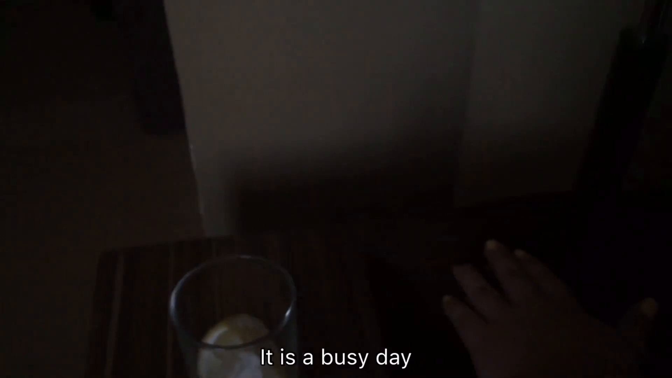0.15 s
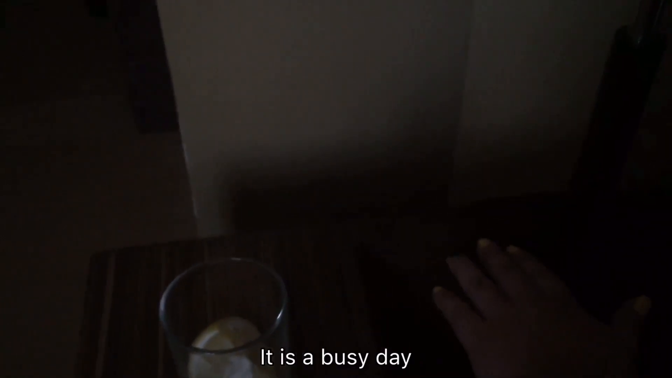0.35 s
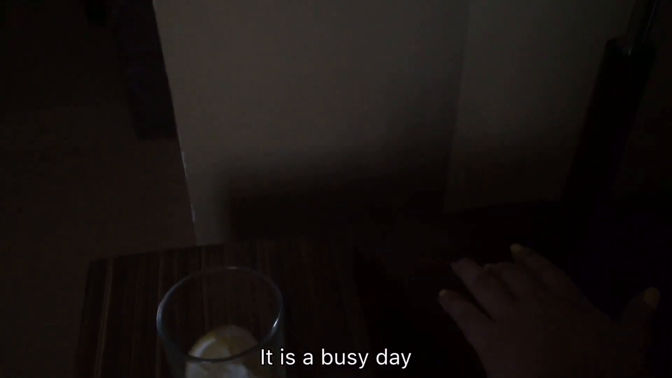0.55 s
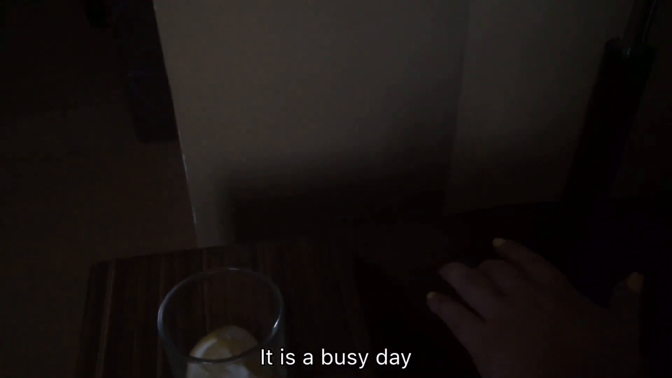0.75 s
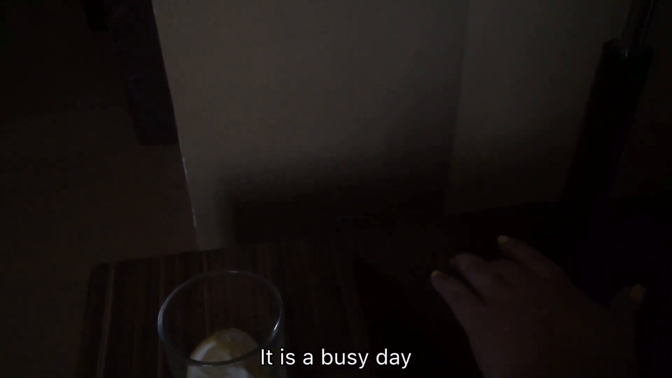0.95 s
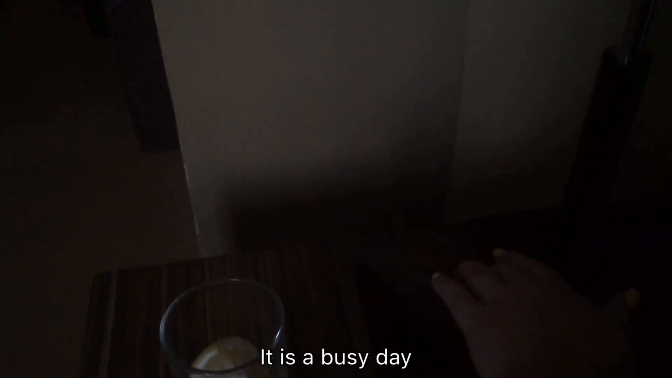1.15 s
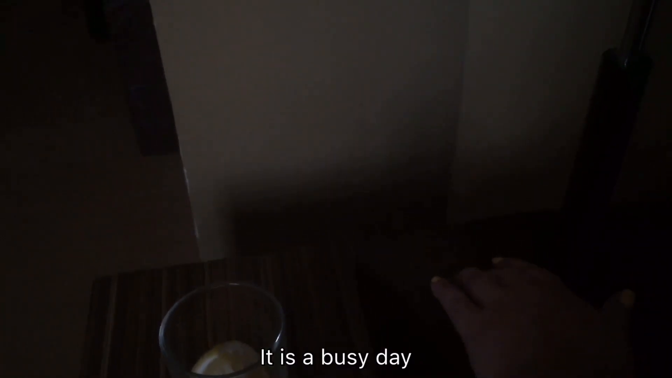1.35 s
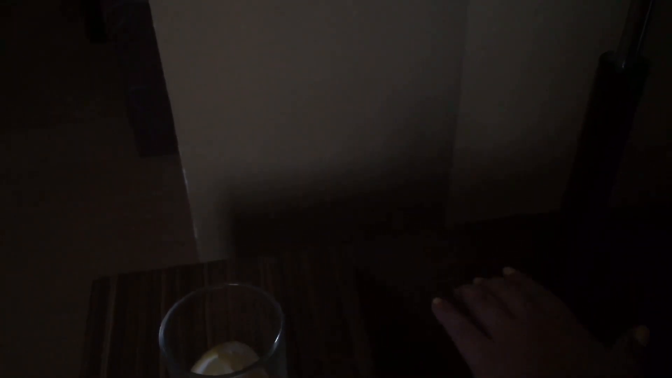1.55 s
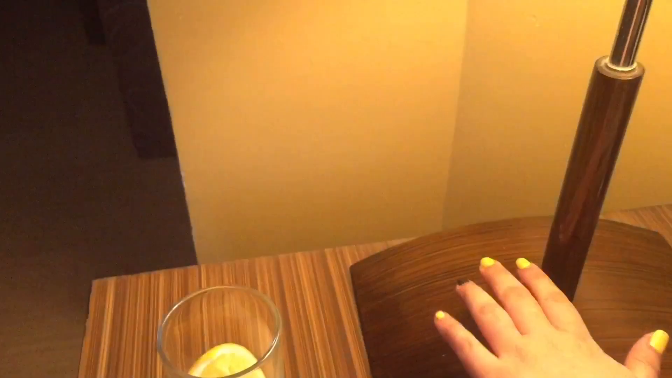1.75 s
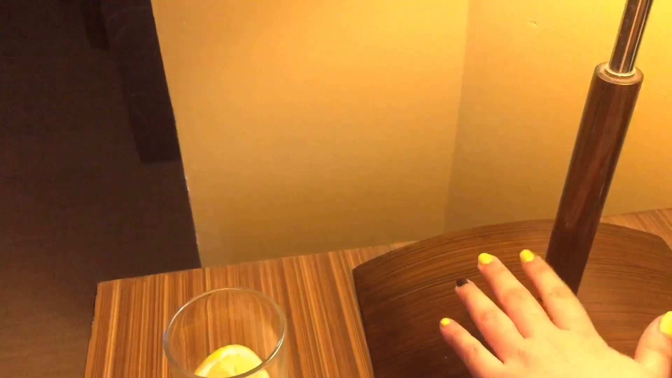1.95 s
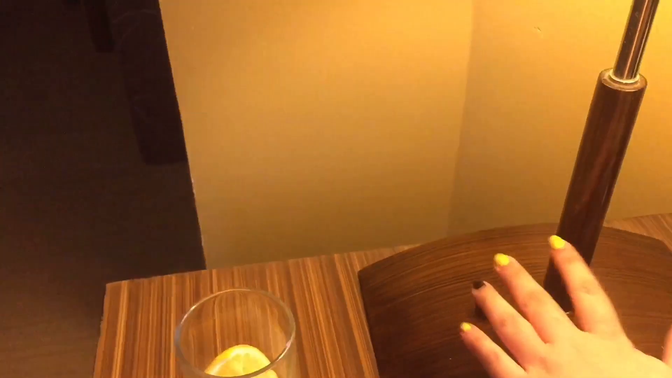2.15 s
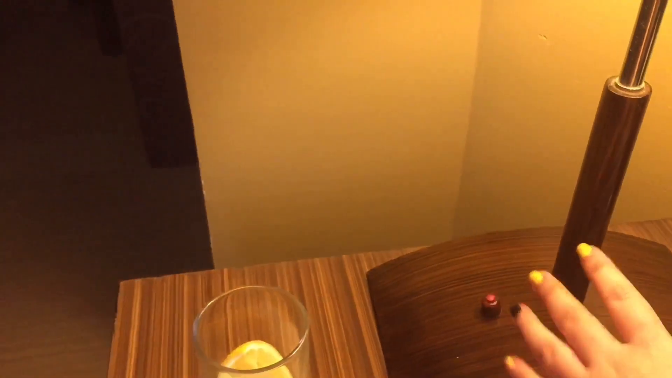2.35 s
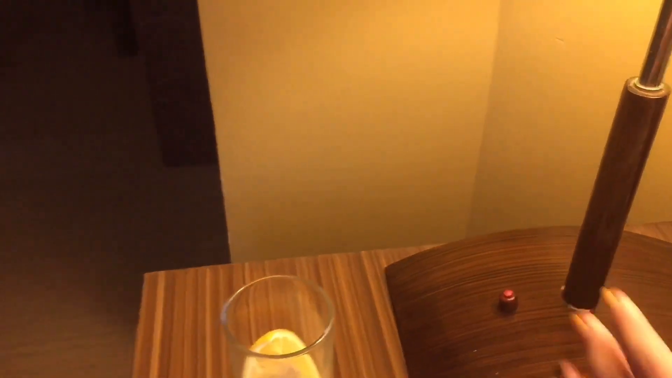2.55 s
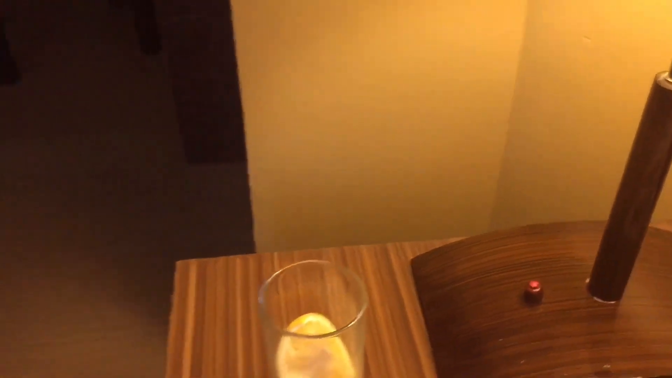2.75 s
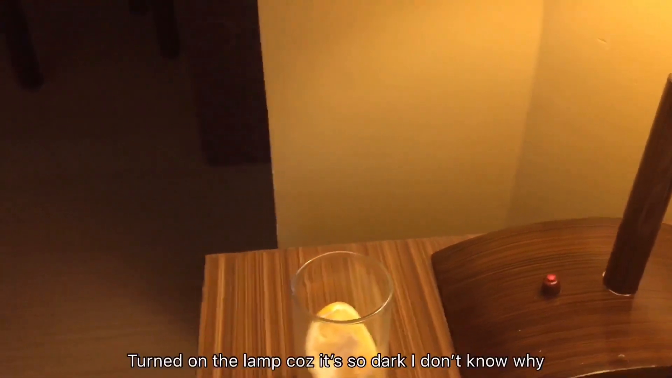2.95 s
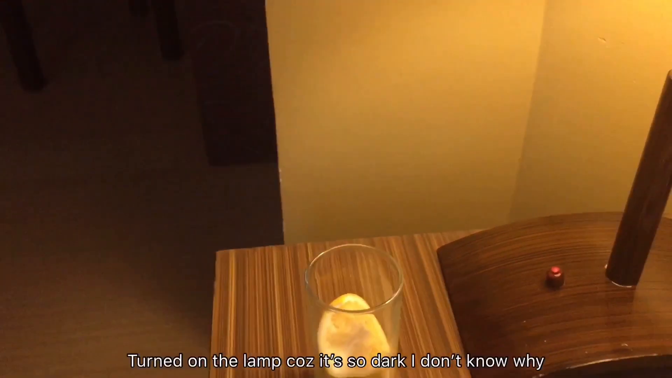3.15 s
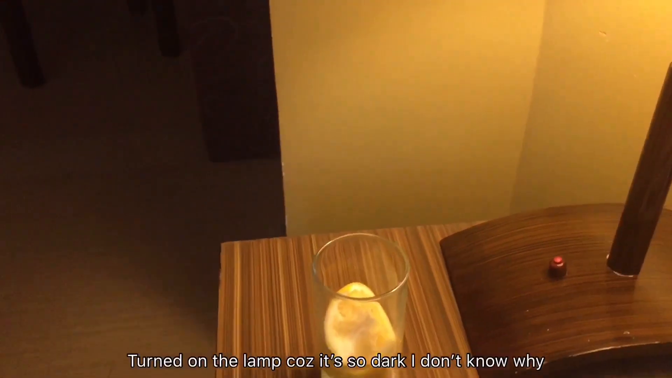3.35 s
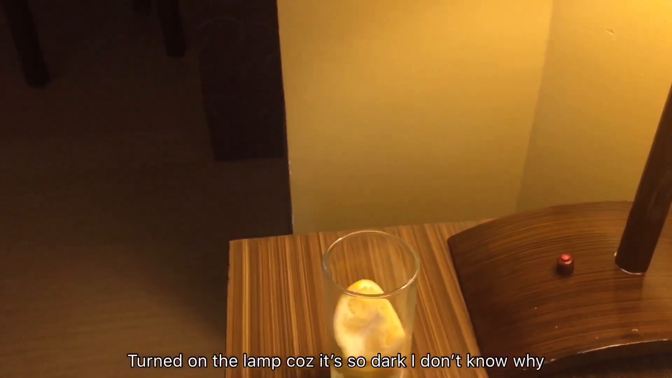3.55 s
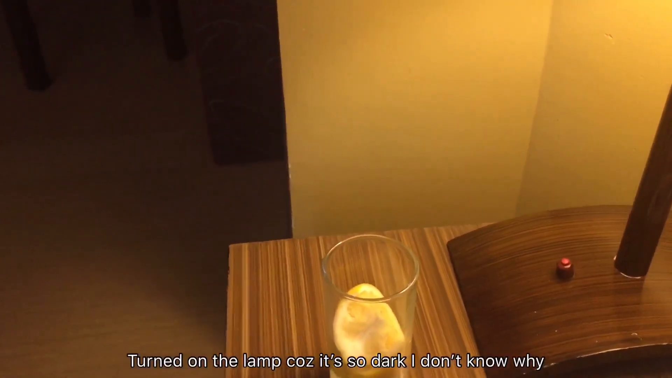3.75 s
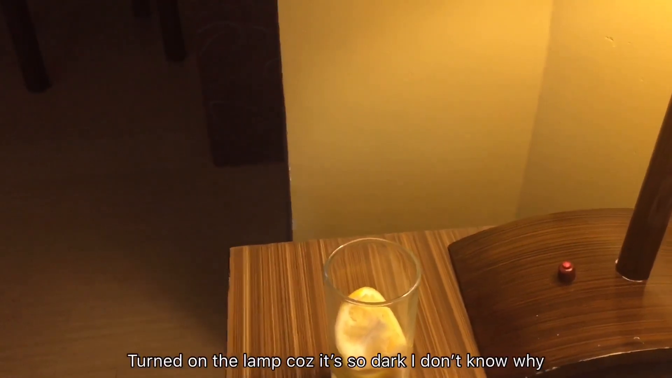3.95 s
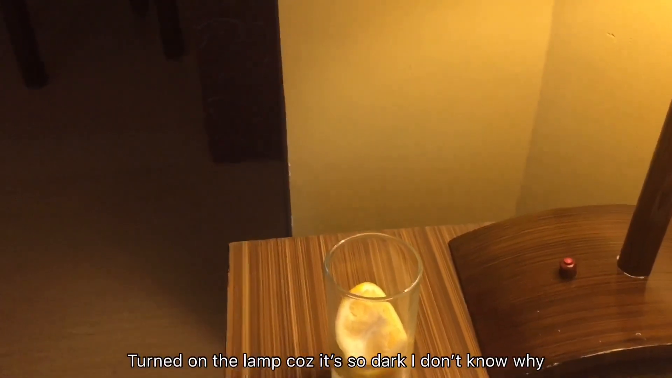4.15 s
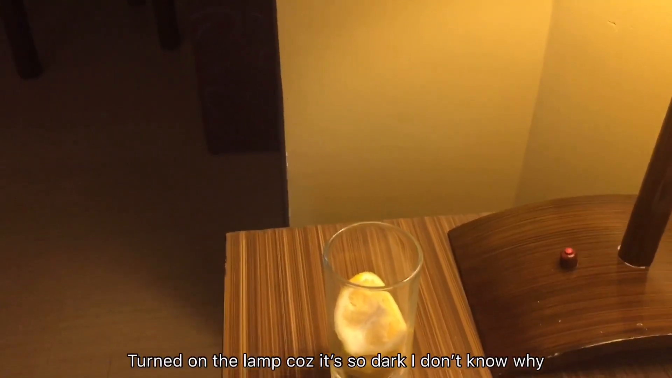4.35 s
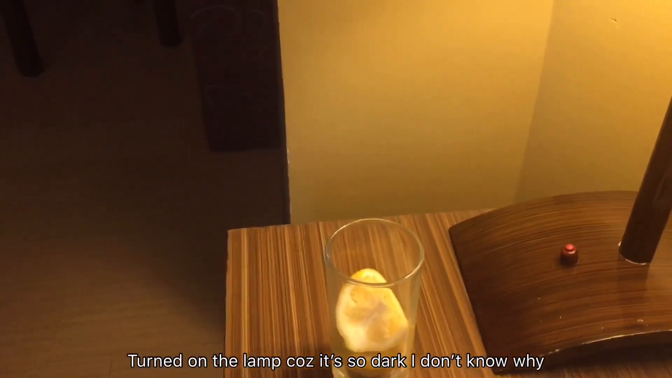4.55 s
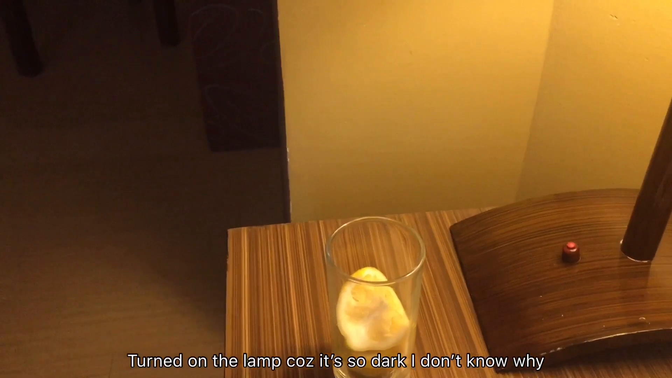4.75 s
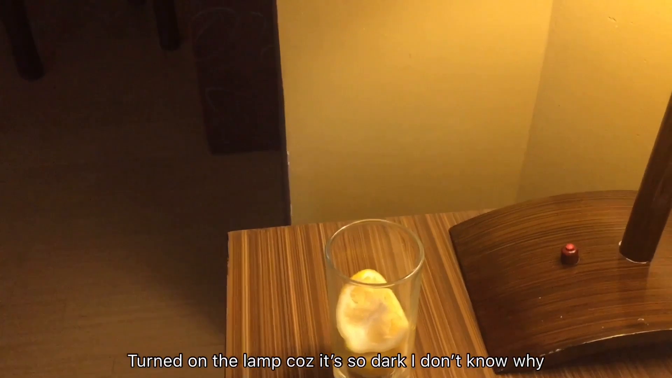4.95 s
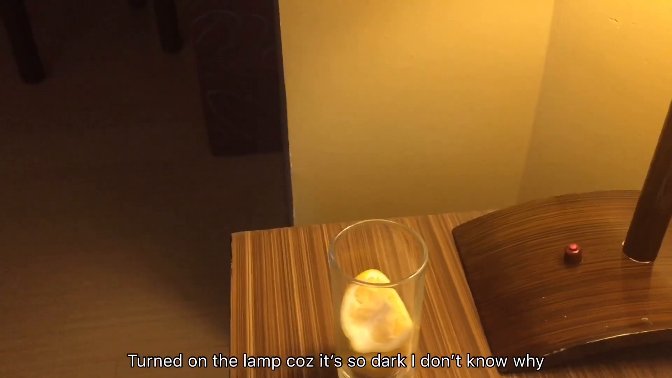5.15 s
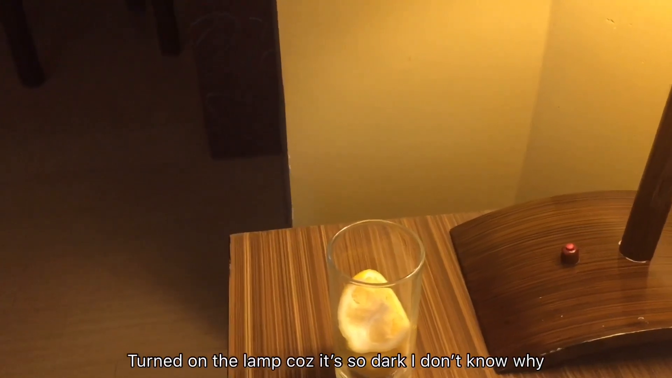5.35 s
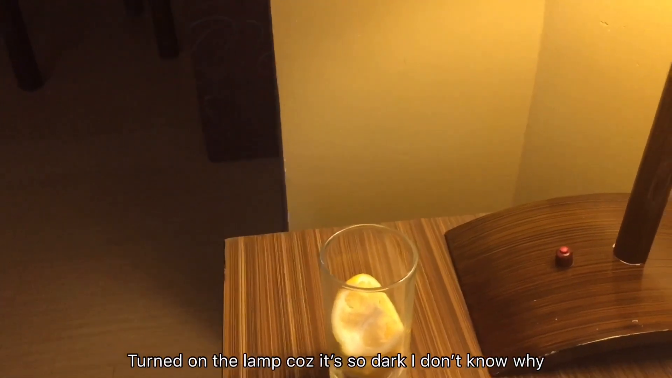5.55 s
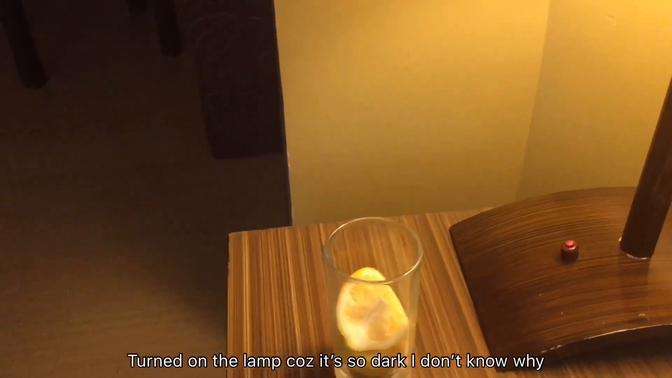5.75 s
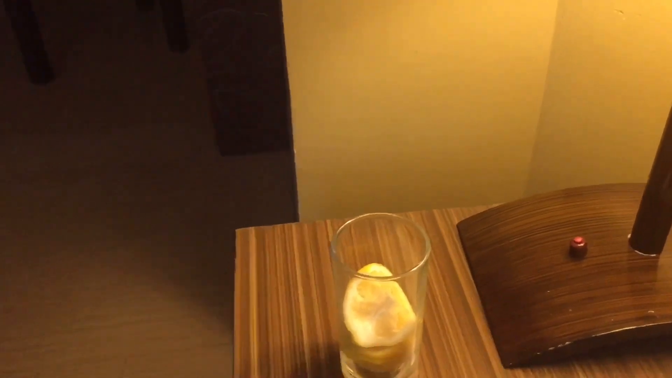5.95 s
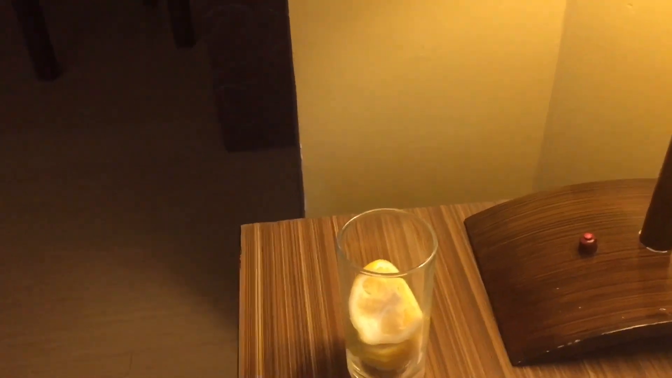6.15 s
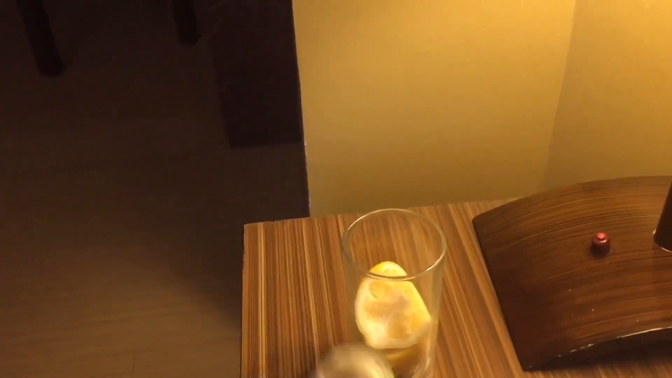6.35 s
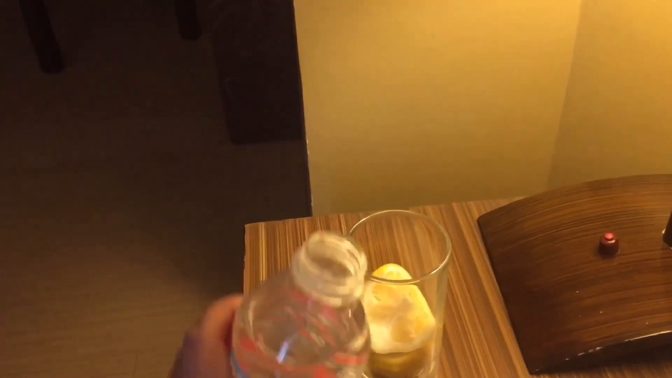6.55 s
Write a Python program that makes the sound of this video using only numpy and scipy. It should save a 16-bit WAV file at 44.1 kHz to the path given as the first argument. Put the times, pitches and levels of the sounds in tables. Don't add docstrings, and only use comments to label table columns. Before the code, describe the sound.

Throughout, a low ventilation rumble fills a quiet furnished room, wavering gently, with soft upper air hiss and a barely audible mid-pitched duct whistle; it swells slightly at the end. At about 1.08 s a lamp push switch gives a sharp, close double-edged click; at 1.66 s it releases with a louder, brighter clack, ringing briefly through base and stem. Soft low booms follow at 1.7 and 2.7 s. A faint ping touches at 2.4 s, and very quiet rubbing passes near 2.9 s. At 3.27 s plastic crackles and scrapes, then tiny squeaks at 3.4 to 3.7 s. Around 3.96 s rubs and ticks lead into a crisp seal snap at 3.99 s, a weaker one at 4.13 s and a hard knock with a small glassy ring at 4.2 s. Light rubs and taps come at 4.5 to 4.6 s, ticks at 5.1 s, and final ticks, a scrape and a small low squeak at 6.0 to 6.15 s.

```python
import sys
import numpy as np
from scipy import signal
from scipy.fft import rfft, irfft
from scipy.io import wavfile
from scipy.ndimage import uniform_filter1d

SR = 44100
rng = np.random.default_rng(int(sys.argv[2]) if len(sys.argv) > 2 else 0)


def level_to_linear(level):
    exponent = np.asarray(level, float) / 20
    return 10 ** exponent


def generate_wav(signal):
    frames = np.transpose(np.atleast_2d(signal))
    scaled = np.clip(frames, -1, 1) * 32767
    pcm = np.round(scaled).astype(np.int16)
    wavfile.write(sys.argv[1], SR, pcm)


N = 294588
T = np.arange(N) / SR


def coloured(x, hz, db):
    f = np.maximum(np.fft.rfftfreq(len(x), 1 / SR), 1)
    gain = level_to_linear(np.interp(np.log(f), np.log(hz), db))
    return irfft(rfft(x) * gain, len(x))


def resonance(x, hz, width_hz):
    b, a = signal.iirpeak(min(hz, .45 * SR), hz / width_hz, fs=SR)
    return signal.lfilter(b, a, x)


def unit(x):
    return x / np.sqrt(np.mean(x ** 2))


def bell(s, half, order=2):
    return np.exp(-np.abs((T - s) / half) ** order / 2)


def even(band):
    power = uniform_filter1d(uniform_filter1d(band ** 2, size=5000), size=5000)
    return band / np.sqrt(power)


def ventilation():
    # frequency in Hz, level in dB per Hz
    air_spectrum = [(15, -26.5), (42, -23), (52, -2), (75, 2), (108, -9.5), (179, -5.5), (237, -18),
                    (305, -18), (440, -29), (749, -36), (2000, -38.5), (4000, -45), (8000, -51),
                    (16500, -54)]
    # frequency in Hz, width in Hz, gain in dB
    room_modes = [(62.5, 6.3, 3), (77.6, 4.1, 4.5), (135, 10, -4.5), (177.8, 8.87, 7.5), (212, 9.2, 5.5),
                  (300, 30, 2), (980, 62, 3.5), (5000, 500, -3.5), (10530, 510, -6)]
    # time in seconds, level in dB
    flow = [(0, -49.5), (.43, -47.5), (.76, -53), (1.06, -49), (1.55, -49.5), (2.1, -48), (2.9, -50),
            (3.3, -49), (4.04, -50), (4.5, -50.5), (4.9, -48.5), (5.3, -49), (5.9, -48.5), (6.5, -49),
            (6.68, -44.5)]
    # time in seconds, half length in seconds, gain in dB
    lull = (5.02, 0.024, -20)
    # time in seconds, level in dB
    duct = [(0, -69), (1.2, -70), (2.3, -70), (3.2, -75.5), (4.5, -74), (5.5, -75), (6.68, -74)]
    air_db, ripple_db = -46.5, 2.5
    gust_db, gusts_per_s = 1.5, 7
    duct_hz, duct_width_hz = 575.4, 25.8

    hz = np.geomspace(15, 20000, num=2000)
    air_hz, air_level_db = np.transpose(air_spectrum)
    db = np.interp(np.log(hz), np.log(air_hz), air_level_db)
    for mode_hz, width_hz, gain_db in room_modes:
        db = db + gain_db / (1 + (2 * (hz - mode_hz) / width_hz) ** 2)
    ripple = uniform_filter1d(rng.standard_normal(len(hz)), size=5) * np.sqrt(5)
    db = db + ripple_db * ripple * np.clip(np.log2(hz / 230), 0, 1) * np.clip(5000 / hz, 0, 1)
    air = level_to_linear(air_db) * unit(coloured(rng.standard_normal(N), hz, db))

    deep = coloured(air, [110, 120], [0, -200])
    upper = coloured(air - deep, [230, 245], [0, -200])
    out = air - deep - upper
    flow_db = np.interp(T, *np.transpose(flow))
    mean_db = np.mean(flow_db)
    lull_s, lull_half_s, lull_db = lull
    stall_db = lull_db * bell(lull_s, lull_half_s)
    # how far each band follows the flow, dB per dB
    for band, band_db, swing in ((deep, -2.5, 1.2), (upper, -2.5, .8)):
        gusts = np.interp(T * gusts_per_s, np.arange(200), rng.standard_normal(200))
        swell_db = swing * (flow_db - mean_db) + gust_db * gusts + stall_db
        out = out + even(band) * level_to_linear(mean_db + band_db + swell_db)

    whistle = resonance(rng.standard_normal(N), duct_hz, duct_width_hz)
    whistle = resonance(whistle, duct_hz, 2 * duct_width_hz)
    return out + unit(whistle) * level_to_linear(np.interp(T, *np.transpose(duct)))


def add(track, s, sound):
    i = int(s * SR)
    track[..., i:i + sound.shape[-1]] += sound[..., :N - i]


def chatter(ms, size=4096):
    noise, spikes = rng.standard_normal((2, size))
    fade = np.exp(-T[:size] * 1000 / ms)
    force = noise * level_to_linear(3 * spikes) * fade
    return force * np.sqrt(np.sum(fade ** 2) / np.sum(force ** 2))


def ring(hz, t60, db, spread, size=16384):
    t = T[:size]
    shift = np.array([[-1], [-.4], [.55], [1.2]]) + rng.uniform(-.12, .12, (4, 1))
    neighbours = np.sum(np.sin(2 * np.pi * hz * (1 + spread * shift) * t), axis=0)
    cluster = .5 * np.sin(2 * np.pi * hz * t) + .33 * neighbours
    decay = np.exp(-np.log(1000) * t / t60)
    return level_to_linear(db) * cluster * decay * np.minimum(t / 0.00081, 1)


def strike(impacts, body, crack_hz, crack_db, knock_hz, knock_db):
    blur = 2.5
    out = np.zeros((2, N))
    for s, db, ms in impacts:
        force = .5 * chatter(ms)
        click = np.sqrt(np.sum(force ** 2)) * (T[:len(force)] == 0)
        push = np.array([force, click])
        crack = resonance(resonance(push, crack_hz, 1.4 * crack_hz), crack_hz, 2 * crack_hz)
        crack = level_to_linear(crack_db) * crack
        knock = resonance(resonance(push, knock_hz, 1.2 * knock_hz), knock_hz, 2 * knock_hz)
        knock = level_to_linear(knock_db) * knock
        near = crack[0] + knock[0]
        parts = [crack[1], knock[1]]
        for k, (hz, width_hz, gain_db) in enumerate(body):
            near = near + (-1) ** k * level_to_linear(gain_db) * resonance(force, hz, width_hz)
            parts.append(level_to_linear(gain_db) * resonance(click, hz, width_hz * blur) / np.sqrt(blur))
        power = np.sum(np.abs(rfft(np.array(parts))) ** 2, axis=0)
        far = np.roll(irfft(np.sqrt(power)), 96)
        far = far * (T[:len(far)] < .02)
        add(out, s, level_to_linear(db) * np.array([near, far]))
    return out


def switch():
    # time in seconds, level in dB, chatter in ms
    press = [
        (1.0765, -13.5, 0.67),
        (1.078, -11, 0.64),
        (1.0806, -10, 1.8),
    ]
    # time in seconds, level in dB, chatter in ms
    release = [
        (1.662, -46.5, 1),
        (1.6631, -13, 2),
        (1.6653, -6, 0.58),
        (1.6663, -1, 1.87),
    ]
    # frequency in Hz, width in Hz, level in dB
    press_body = [(1074, 44, 12.5), (1530, 43, 14), (2650, 440, 7.5), (4440, 290, 7.5), (5360, 280, -2),
                  (7000, 570, 5.5), (7760, 340, 2), (9670, 370, 2), (11400, 620, -4), (13200, 260, 0),
                  (14800, 390, -9)]
    # frequency in Hz, width in Hz, level in dB
    release_body = [(1530, 220, -8.5), (2058, 210, 1.5), (3000, 220, 3.5), (4250, 710, 3.5),
                    (5600, 220, 6.5), (6480, 260, 8), (7050, 250, 1), (8320, 600, 4.5), (10400, 300, -5.5),
                    (13020, 400, 2.5), (14300, 400, -6), (15400, 400, -11)]
    # frequency in Hz, t60 in seconds, press level in dB, release level in dB
    lamp_rings = [(140, 0.47, -46, -35.5), (1054, 0.25, -50, -58), (1519, 0.19, -46, -34),
                  (1540, 0.063, -39, -28.5), (2067, 0.23, -51, -29), (2636, 0.26, -45, -58.5),
                  (3010, 0.1, -54, -45), (4360, .3, -43, -58.5), (5620, 0.3, -58, -37),
                  (6886, .14, -40, -45), (13230, .07, -50, -50)]
    out = strike(press, press_body, crack_hz=6000, crack_db=-8, knock_hz=1050, knock_db=-17)
    out += strike(release, release_body, crack_hz=7500, crack_db=-7.0, knock_hz=810, knock_db=-15.5)
    for hz, t60, press_db, release_db in lamp_rings:
        add(out, press[1][0], ring(hz, t60, press_db, spread=.05))
        add(out, release[2][0], ring(hz, t60, release_db, spread=.016))
    return out


def room(x, size=22050):
    # frequency in Hz, t60 in seconds, level in dB
    absorption = [(202.2, .35, -2), (1500, 0.2, 3.5), (4000, 0.3, 0.5), (8000, 0.14, -2), (16100, 0.26, 2)]
    onset_s = 0.001
    t, tail = T[:size], 0
    hz, t60, db = np.transpose(absorption)
    for f in 150 * 2 ** np.arange(0, 7, .5):
        band_db = np.interp(np.log(f), np.log(hz), db)
        band_t60 = np.interp(np.log(f), np.log(hz), t60)
        band = resonance(rng.standard_normal(size), f, f / 2.2) * level_to_linear(band_db)
        tail = tail + band * np.exp(-np.log(1000) * t / band_t60)
    tail = tail * np.minimum(t / onset_s, 1) ** 2
    return signal.fftconvolve(x, tail / np.sqrt(np.sum(tail ** 2)))[:N]


def booms():
    # time in seconds, half length in seconds, rms level in dB
    shifts = [
        (1.11, 0.024, -52),
        (1.71, .04, -44),
        (2.675, 0.13, -45),
        (4.232, 0.044, -45),
        (5.88, 0.047, -48),
        (6.628, 0.022, -53),
    ]
    hz, width_hz = 76.3, 6
    hum = resonance(resonance(rng.standard_normal(N), hz, width_hz), hz, width_hz)
    return even(hum) * sum(level_to_linear(db) * bell(s, half, order=4) for s, half, db in shifts)


def rubs():
    # time in seconds, half length in seconds, rms level in dB, centre in Hz
    brushes = [(1.653, 0.01, -66, 6000), (2.84, .045, -70, 10190), (2.908, 0.039, -69, 4000),
               (2.949, 0.086, -70.5, 1984), (3.295, 0.019, -54, 6350), (3.275, .012, -54.5, 1500),
               (3.316, 0.028, -58.5, 4500), (3.548, 0.12, -73, 3400), (3.948, 0.015, -57, 3250),
               (3.969, 0.01, -49.5, 2460), (4.01, 0.0074, -57, 895), (4.034, 0.093, -63, 6000),
               (4.224, 0.02, -56, 2370), (4.624, 0.022, -61.5, 3000), (5.11, 0.0094, -62, 10000),
               (5.385, .03, -76, 10000), (6.056, 0.03, -65.5, 11000)]
    # time in seconds, half length in seconds, rms level in dB, centre in Hz
    scrapes = [(3.289, 0.014, -54, 15100), (3.507, .02, -75, 14060), (3.651, 0.027, -69.5, 6800),
               (3.681, 0.024, -70, 8850), (4.495, 0.0065, -67, 6690), (4.536, 0.016, -70.5, 6200),
               (4.603, 0.0071, -67, 6450), (4.615, 0.019, -58.5, 3070), (4.636, 0.021, -56, 950),
               (4.988, 0.011, -69, 3000), (5.117, 0.0088, -53.5, 3450), (5.139, .02, -66, 3290),
               (5.272, 0.032, -74.5, 3390), (5.378, 0.016, -71.5, 3000), (6.047, 0.025, -62, 1237)]
    # time in seconds, half length in seconds, rms level in dB, centre in Hz
    squeaks = [
        (3.428, 0.015, -67.5, 6800),
        (3.511, 0.014, -65, 6800),
        (3.668, 0.019, -65.5, 3180),
        (3.668, 0.02, -66.5, 5630),
        (6.148, 0.0088, -62, 1275),
    ]
    out, slip_db = np.zeros(N), 3
    t = T[:8192] - T[4096]
    for rows, share in ((brushes, 1), (scrapes, 0.24), (squeaks, 0.058)):
        for s, half, db, hz in rows:
            width = min(share * hz, 10000)
            slips = level_to_linear(slip_db * np.repeat(rng.standard_normal(64), 128))
            force = slips * chatter(1e6, size=8192)
            grit = unit(resonance(resonance(force, hz, width), hz, 2.2 * width))
            add(out, s - T[4096], level_to_linear(db) * grit * np.exp(-(t / half) ** 2 / 2))
    return out


def ticks():
    # time in seconds, level in dB, centre in Hz, chatter in ms
    pings = [
        (2.41, -46, 1500, 2.6),
        (2.411, -51, 3780, 5.4),
        (4.2095, -36, 9650, 3.5),
        (5.114, -34.5, 3630, 3.2),
        (5.116, -38, 13200, 4.6),
        (6.000, -43, 8300, 1.01),
    ]
    # time in seconds, level in dB, centre in Hz, chatter in ms
    small_ticks = [(3.736, -49, 13000, 1.96), (3.9589, -38, 6000, 0.82), (3.9644, -30, 5450, 3.5),
                   (4.012, -32, 6500, 2), (4.3912, -41, 2720, 2.3), (4.5018, -39, 6300, 1.9),
                   (4.5927, -41.5, 3000, 3.9), (4.614, -47, 13000, 2), (4.620, -43, 14500, 2.1),
                   (4.621, -41.5, 7500, 2.9), (6.037, -29.5, 9100, 1.6), (6.040, -34, 11000, 3.3)]
    # time in seconds, level in dB, centre in Hz, chatter in ms
    cracks = [
        (3.2655, -30.5, 3000, 6.9),
        (3.282, -35.5, 6500, 9.2),
        (3.9587, -30.5, 1880, 3.1),
        (4.021, -45, 6470, 3),
        (4.2093, -36, 5000, 1.8),
    ]
    # time in seconds, level in dB, centre in Hz, chatter in ms
    thuds = [
        (3.9605, -36, 500, 15),
        (4.2028, -23, 3120, 3.7),
        (4.2035, -38.5, 790, 16),
    ]
    out = np.zeros(N)
    for rows, share, broad_db in ((pings, 0.062, -10), (small_ticks, 0.43, -5.5),
                                  (cracks, 1, 2.5), (thuds, 0.96, -13)):
        for s, db, hz, ms in rows:
            force, width = chatter(ms), share * hz
            peak = resonance(resonance(force, hz, width), hz, 2 * width) * np.sqrt(SR / 4 / width)
            click = level_to_linear(broad_db) * resonance(force, 2300, 8100)
            add(out, s, level_to_linear(db) * (peak + click) / 3)
    return out


def taps():
    # time in seconds, frequency in Hz, t60 in seconds, level in dB
    rings = [
        (2.411, 1523, 0.038, -54.5),
        (4.129, 3900, .04, -52),
        (4.209, 546, 0.33, -52.5),
        (4.2098, 3100, 0.12, -46),
        (4.209, 6000, 0.036, -46.5),
        (4.601, 565, 0.22, -49),
        (4.599, 3000, .05, -59),
        (6.145, 1280, 0.08, -54.5),
    ]
    out = np.zeros(N)
    for s, hz, t60, db in rings:
        add(out, s, ring(hz, t60, db, spread=.005))
    return out


def snaps():
    # time in seconds, level in dB, chatter in ms
    first = [
        (3.9902, 3, 0.021),
        (3.9912, -24, 1.2),
        (3.9930, -17.5, 1.1),
    ]
    # time in seconds, level in dB, chatter in ms
    second = [
        (4.1290, -18, 0.89),
        (4.1303, -23, 3),
    ]
    # frequency in Hz, width in Hz, level in dB
    first_body = [(3350, 350, 0), (5150, 310, -1), (6700, 190, -18), (8200, 240, 2), (8600, 170, -20),
                  (11400, 330, -30), (12900, 230, -7), (14900, 460, -30)]
    # frequency in Hz, width in Hz, level in dB
    second_body = [(690, 56, 10), (1770, 116, 10), (2600, 300, 8), (3850, 240, 16), (5000, 860, -4),
                   (6200, 320, -22), (8000, 590, -22), (11200, 900, -31)]
    out = strike(first, first_body, crack_hz=4270, crack_db=4.5, knock_hz=563, knock_db=4.0)
    out += strike(second, second_body, crack_hz=4500, crack_db=3.0, knock_hz=940, knock_db=0.5)
    return out


def scene():
    lamp_room_db, bottle_room_db = -12.5, -13.5
    lamp, lamp_far = switch()
    cap, cap_far = snaps() + rubs() + ticks() + taps()
    echo = room(level_to_linear(lamp_room_db) * lamp_far + level_to_linear(bottle_room_db) * cap_far)
    return (ventilation() + booms() + lamp + cap + echo)[None]


def band_limit(x):
    return signal.sosfilt(signal.butter(12, 16620, fs=SR, output="sos"), x)


def record(dry):
    top_cut = signal.ellip(8, .3, 50, 15900, fs=SR, output="sos")
    mix = signal.sosfilt(top_cut, dry)
    return band_limit(mix)


dry = scene()
out = record(dry)
generate_wav(out)
```